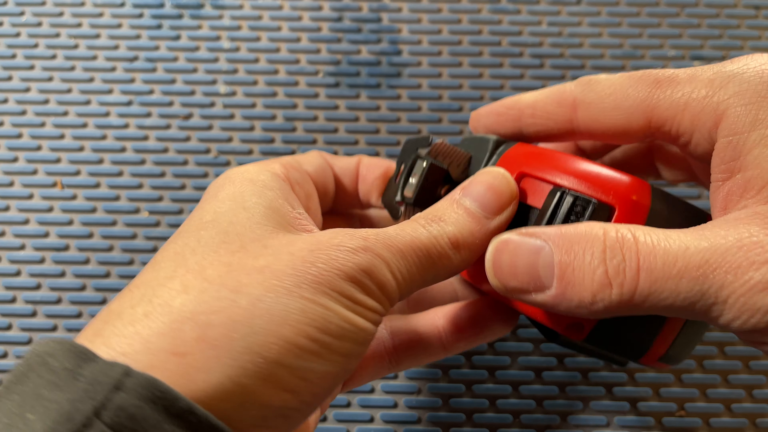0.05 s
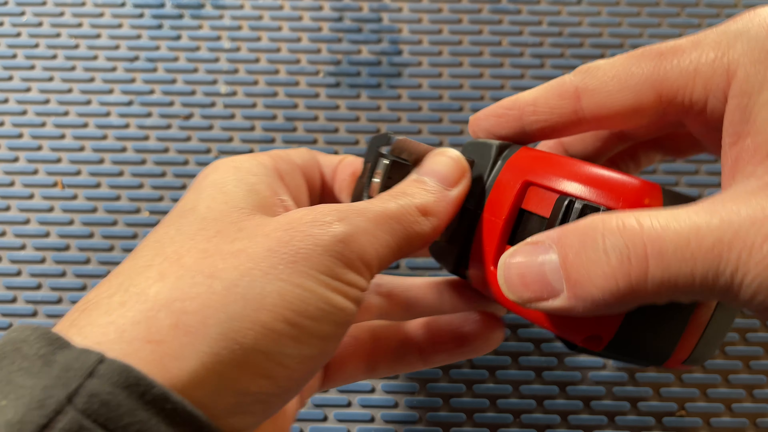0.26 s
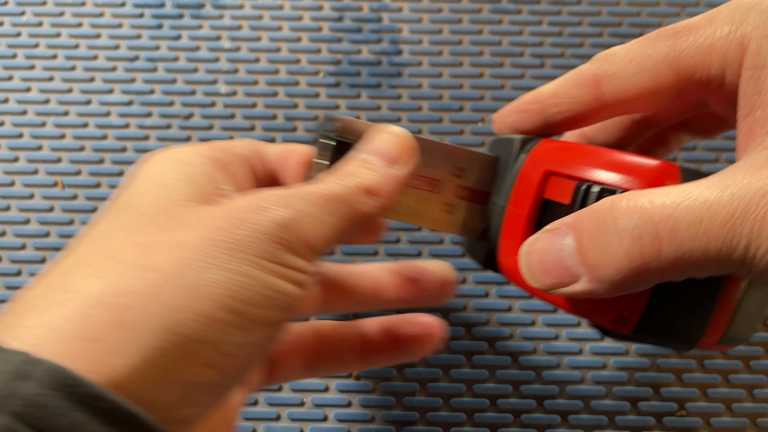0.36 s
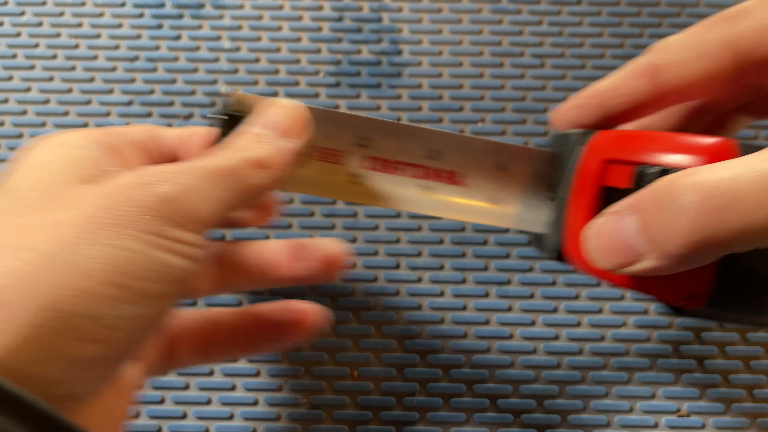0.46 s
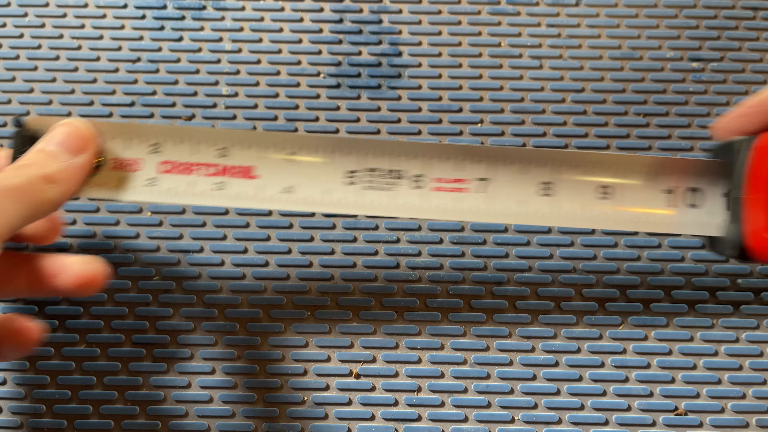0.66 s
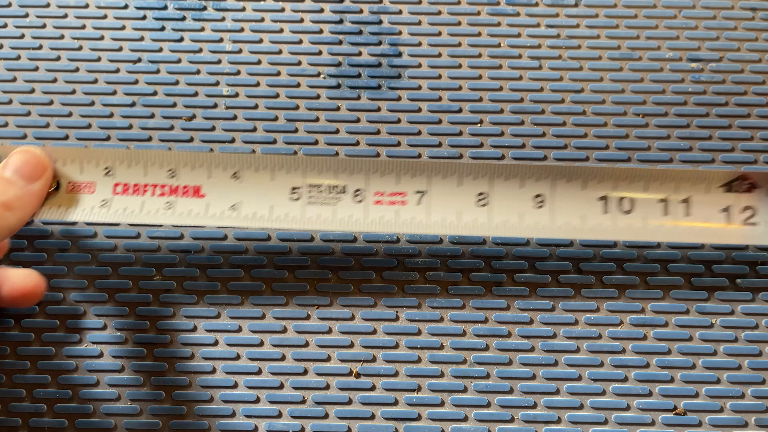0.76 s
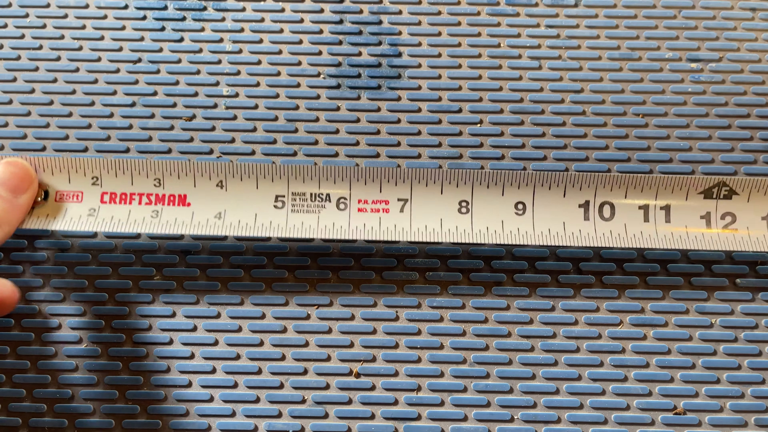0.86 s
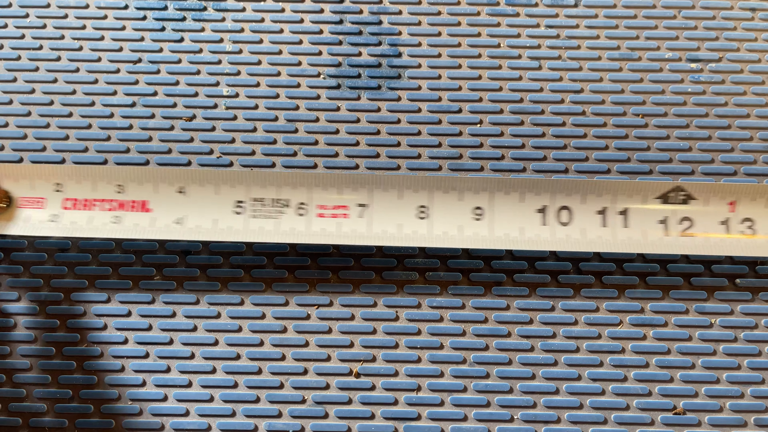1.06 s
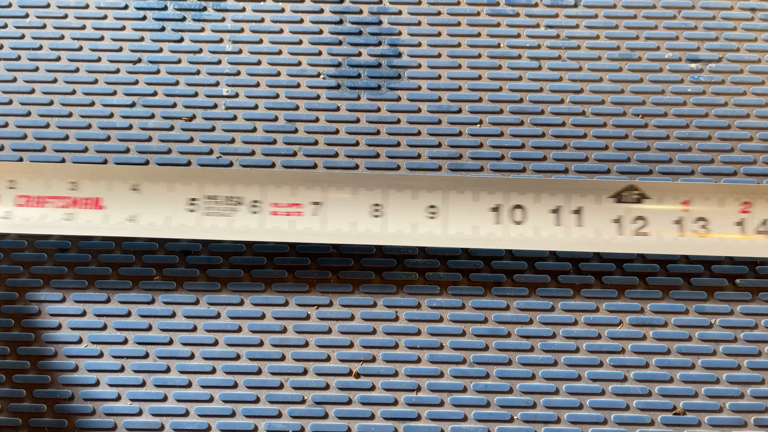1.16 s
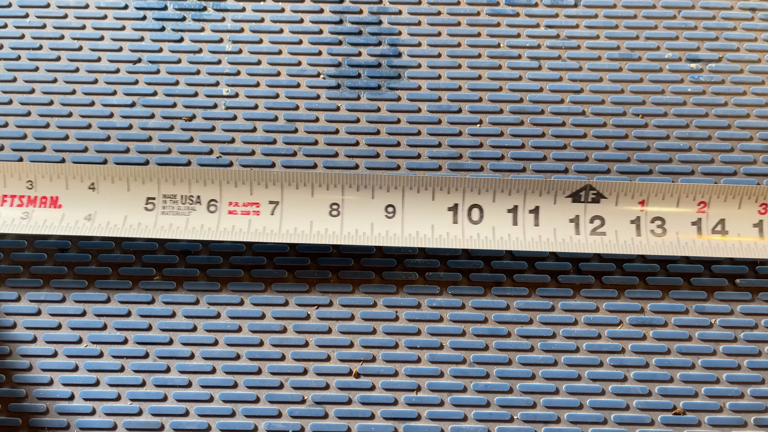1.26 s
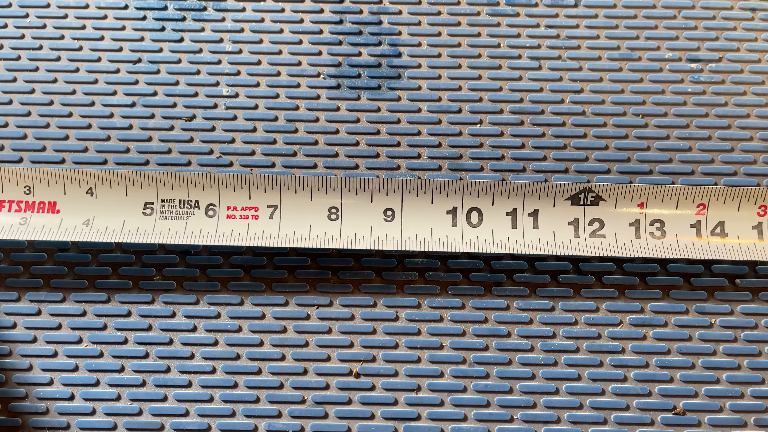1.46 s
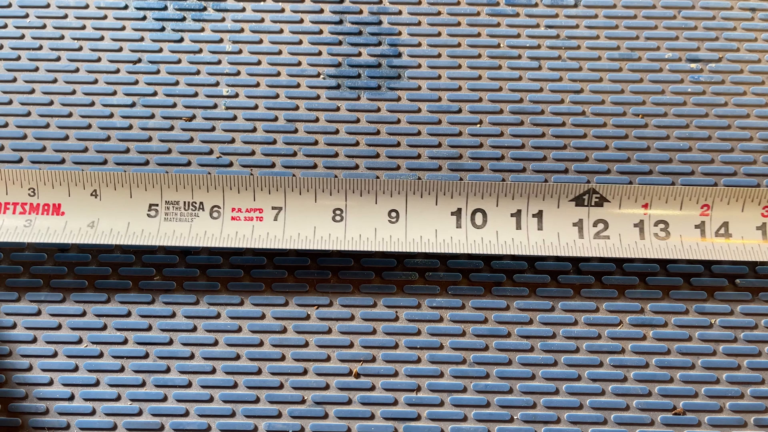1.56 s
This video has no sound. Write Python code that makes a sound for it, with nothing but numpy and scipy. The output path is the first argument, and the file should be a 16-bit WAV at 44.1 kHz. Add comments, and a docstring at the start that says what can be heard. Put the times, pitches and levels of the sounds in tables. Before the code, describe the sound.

Tape measure blade pulled from its case with a snap, a scrape and a soft thump.

```python
"""A small room with a low hum, where a steel tape measure is drawn out of its plastic case, close up.
Fingers tick, scuff and thud on the case, then the hook snaps free and rings the shell.
Friction in the slot makes the blade hiss, fast at first, then slowly, with sharp catches and thin
squeals; its bending modes fall as it lengthens, giving a metallic swish. The case thumps down on a
padded mat and is nudged a few times; the blade stops and the hum remains."""
import sys
import numpy as np
from scipy import signal
from scipy.fft import rfft, irfft
from scipy.io import wavfile

SR = 44100
rng = np.random.default_rng(int(sys.argv[2]) if len(sys.argv) > 2 else 0)


def file_out(sig):
    """Save sig as 16-bit WAV at sys.argv[1]."""
    # one column per channel
    cols = np.atleast_2d(sig).T
    # limit, then scale
    lim = np.clip(cols, -1, 1)
    pcm = np.round(lim * 32767).astype(np.int16)
    wavfile.write(sys.argv[1], SR, pcm)


N = 70560
TIME = np.arange(N) / SR
FREQS = np.maximum(np.fft.rfftfreq(N, 1 / SR), 1)

# colour of the room tone: (frequency [Hz], relative level [dB])
ROOM_TONE_COLOUR = [(25, -9.5), (60, -9.5), (130, 6.5), (200, -4), (300, -5.5), (450, -19.5), (900, -20),
                    (1400, -42.5), (3000, -52.5), (12000, -51)]
# partials of the hum: (frequency [Hz], level [dB])
HUM_PARTIALS = [(64.6, -57), (107.7, -66.5), (150.7, -54)]
# the hook shifts under the fingers: (time [s], half length [s], level [dB], brightness [Hz])
HOOK_RUBS = [(0.012, 0.067, -49, 2190), (0.179, 0.011, -46, 12000), (0.23, 0.066, -54.5, 2200)]
# colour of the hook rubbing on the case: (frequency [Hz], relative level [dB])
HOOK_RUB_COLOUR = [(600, -6), (1150, -10), (1500, -2), (2200, -1), (3000, -1), (4500, -7.5), (7500, -5.5),
                   (9400, 2), (12000, -3)]
# bright ring of hook and case when struck: (frequency [Hz], t60 [s], gain [dB])
CASE_RING_MODES = [(1502, 0.019, -1), (1687, 0.014, 0), (2188, 0.023, -2), (3295, 0.014, -6.5),
                   (3735, 0.0088, -6), (4500, 0.019, -1), (5270, 0.0091, -11.5), (6324, 0.017, -10),
                   (8260, 0.013, -12), (9370, 0.0061, -3), (10770, 0.0098, -2.5)]
# hollow knock of the shell: (frequency [Hz], t60 [s], gain [dB])
SHELL_KNOCK_MODES = [(487, 0.029, -9), (934, 0.019, -7), (1950, 0.017, 0.5)]
# fingers tick on the case: (time [s], gain [dB], brightness [Hz], relative shell knock [dB])
FINGER_TAPS = [(.0075, -37, 1650, -18), (0.027, -44, 1500, 5), (0.0666, -37.5, 2000, 0),
               (0.0945, -33, 4070, -6), (0.0975, -38, 1500, 1)]
# dull thuds: a finger on the case, then the case landing and being nudged:
# (time [s], boom gain [dB], knock gain [dB], knock pitch [Hz])
DULL_THUDS = [(.058, -63.5, -41.5, 397), (0.8725, -29.5, -36.5, 308), (0.884, -31.5, -40.5, 690),
              (0.8903, -54, -27, 339), (1.015, -41, -47, 300), (1.111, -40.5, -40, 366),
              (1.179, -39.5, -36.5, 453), (1.263, -66, -43, 390)]
# the hook slips and snaps free: (time [s], gain [dB], brightness [Hz])
SNAP_CONTACTS = [(0.2218, -26.5, 11840), (0.2231, -29.5, 13930), (.2243, -14.5, 7030), (0.2264, -16, 2154)]
# loudness of the sliding blade: (time [s], level [dB], relative ring of blade and case [dB])
PULL_ENVELOPE = [(.3, -67, 8), (.355, -66.5, 13), (.4, -49, 4), (.48, -37.5, -4), (.585, -35, -5.5),
                 (.64, -36, -16), (.76, -37, -14), (.83, -42, -3.5), (.87, -45, -3), (.905, -55.5, 1),
                 (.96, -49.5, -11), (1.02, -51, -12), (1.045, -45.5, -36), (1.08, -50.5, -6),
                 (1.145, -51.5, -8), (1.168, -45, -11), (1.21, -53, -36), (1.262, -48.5, -16),
                 (1.315, -56.5, -7), (1.35, -78.5, 8.5), (1.42, -100, 12)]
# how far the blade is out: (time [s], length [m])
FREE_LENGTH = [(.34, .067), (.415, .08), (.44, .089), (.57, .125), (.65, .151), (.8, .184), (1.32, .22)]
# colour of the hiss at speed: (frequency [Hz], relative level [dB])
FAST_HISS_COLOUR = [(300, -16.5), (600, -35), (850, -11.5), (1200, -40), (2100, -3.5), (3400, -5),
                    (5200, -3.5), (7300, -5.5), (8000, -1.5), (8600, 4.5), (9400, 1), (10000, 1.5),
                    (11000, 5.5), (11700, -9), (12500, -18)]
# colour of the hiss at a crawl: (frequency [Hz], relative level [dB])
SLOW_HISS_COLOUR = [(300, -2.5), (700, -7.5), (1100, -9.5), (2100, -3.5), (3600, -4.5), (5000, -3.5),
                    (6400, 0.5), (7800, -3.5), (9200, -4.5), (10500, 5), (11300, -6), (12300, -24)]
# resonances of the case around the sliding blade: (frequency [Hz], width [Hz], relative level [dB])
CASE_RASP_MODES = [(1484, 200, -1), (2130, 110, 0.5), (2630, 270, -2.5), (3480, 157.6, -3.5)]
# colour of the blade's bending modes: (frequency [Hz], relative level [dB])
SWISH_COLOUR = [(600, -20), (830, -9), (1400, -6), (2100, -2), (4500, 1), (9000, -6)]
# the blade catches in the slot: (time [s], gain [dB])
SLOT_CATCHES = [(.4767, -27), (.7266, -27), (.768, -24), (.8163, -23), (1.1755, -34), (1.2150, -33)]
# the blade sings: (time [s], half length [s], pitch [Hz], width [Hz], level [dB])
BLADE_SQUEALS = [(0.822, 0.034, 4200, 30, -51), (1.014, 0.06, 2545, 40, -57.5),
                 (1.172, 0.016, 5820, 600, -48.5)]
# stereo image of the close sounds: (frequency [Hz], left lead [rad], left minus right [dB])
STEREO_IMAGE = [(100, 0, 0), (1300, 0, .8), (2000, .3, 1.6), (3000, 1.0, 3), (4500, .6, 3.8),
                (6500, .3, 2.5), (7500, .7, 1.5), (8550, 0, 0), (9400, -1.4, 0), (10280, -3.14, 0),
                (11000, -4.8, 0), (11700, -6.1, 0)]

CASE_LOW_CUT_HZ, TOP_CUT_HZ = 1110, 13100


def from_db(db):
    """Decibels to gain."""
    return 10 ** (np.asarray(db) / 20)


def unit_rms(x):
    """Scale to unit level."""
    return x / np.sqrt(np.mean(x ** 2) + 1e-20)


def over_time(rows):
    """Columns of an envelope at every sample."""
    times, *columns = np.transpose(rows)
    return [np.interp(TIME, times, c) for c in columns]


def over_frequency(rows):
    """Columns of a spectrum at every frequency."""
    hz, *columns = np.transpose(rows)
    return [np.interp(np.log(FREQS), np.log(hz), c) for c in columns]


def coloured(x, colour):
    """EQ a sound and bring it to unit level."""
    return unit_rms(irfft(rfft(x) * from_db(over_frequency(colour)[0]), N))


def soften(x, hz):
    """One-pole low-pass."""
    pole = np.exp(-2 * np.pi * hz / SR)
    return signal.lfilter([1 - pole], [1, -pole], x + 1e-18)


def low_cut(x, hz):
    """Two-pole high-pass."""
    return signal.sosfilt(signal.butter(2, hz, "high", fs=SR, output="sos"), x + 1e-18)


def drift(rate_hz):
    """A smooth random wobble at unit level."""
    return unit_rms(irfft(rfft(rng.standard_normal(N)) / (1 + (FREQS / rate_hz) ** 2), N))


def swell(s, half_s):
    """A bell-shaped fade in and out, peaking at time s."""
    return np.exp(-((TIME - s) / half_s) ** 2)


def ring(s, hz, t60):
    """A mode struck at time s: a dying sine of height 1."""
    click = signal.unit_impulse(N, int(s * SR))
    r, w = from_db(-60 / (t60 * SR)), 2 * np.pi * hz / SR
    return signal.lfilter([0, np.sin(w)], [1, -2 * r * np.cos(w), r * r], click + 1e-18)


def resonate(x, hz, width_hz):
    """Band resonance with gain 1 at its peak."""
    r, w = np.exp(-np.pi * width_hz / SR), 2 * np.pi * hz / SR
    return signal.lfilter(np.array([1, 0, -1]) * (1 - r * r) / 2, [1, -2 * r * np.cos(w), r * r], x)


def room_tone(noise_db=-56.5):
    """A bed of low noise, centred in the bass, and a hum wavering in level and phase."""
    sides = from_db(1.5) * low_cut(rng.standard_normal((2, N)), 250)
    noise = coloured(rng.standard_normal(N) + sides, ROOM_TONE_COLOUR)
    hum = sum(from_db(db + 2 * drift(12)) * np.sin(2 * np.pi * hz * TIME + 1.7 * drift(7.2))
              for hz, db in HUM_PARTIALS)
    return from_db(noise_db) * noise + hum


def friction(grains_per_s=5200, grain_share=.24, sides_top_hz=6800):
    """Sliding surfaces: fine hiss grained with tiny catches, plus duller noise for stereo width."""
    sizes = from_db(1.5 * np.minimum(rng.exponential(1, N), 3)) * rng.choice([-1, 1], N)
    grains = unit_rms(sizes * (rng.random(N) < grains_per_s / SR))
    centre = np.sqrt(grain_share) * grains + np.sqrt(1 - grain_share) * rng.standard_normal(N)
    sides = soften(soften(rng.standard_normal((2, N)), sides_top_hz), sides_top_hz)
    return centre + sides


def hook_rubs():
    """Short scuffs of the hook against the case."""
    rub = coloured(friction(), HOOK_RUB_COLOUR)
    fade_in = np.interp(TIME, [0, .005], [0, 1])
    return fade_in * sum(from_db(db) * swell(s, half_s) * unit_rms(soften(rub, hz))
                         for s, half_s, db, hz in HOOK_RUBS)


def crack(s, decay_s):
    """The attack of a hard contact: a very short, bright noise burst."""
    age = np.maximum(TIME - s, 0)
    burst = rng.standard_normal(N) * (age > 0) * np.exp(-age / decay_s)
    return low_cut(burst, CASE_LOW_CUT_HZ)


def case_click(s, bright_hz):
    """One contact cracks and rings hook and case; so small a body radiates little bass."""
    modes = sum((-1) ** k * from_db(db) * ring(s, hz, t60)
                for k, (hz, t60, db) in enumerate(CASE_RING_MODES))
    attack = from_db(-5) * crack(s, decay_s=.0015)
    return soften(low_cut(modes, CASE_LOW_CUT_HZ) + attack, bright_hz)


def finger_taps():
    """Fingers set off small clicks, each with a hollow knock of the shell."""
    taps = np.zeros(N)
    for s, db, bright_hz, shell_db in FINGER_TAPS:
        shell = sum(from_db(mode_db) * ring(s, hz, t60) for hz, t60, mode_db in SHELL_KNOCK_MODES)
        taps += from_db(db) * (case_click(s, bright_hz) + from_db(shell_db) * shell)
    return taps


def dull_thuds(landing_s=.89, scuff_s=.0116, scuff_db=-39, scuff_hz=870):
    """Low booms with dull knocks: a finger on the case, then its scuffing landing and nudges."""
    hits = sum(from_db(boom_db) * ring(s, hz=67, t60=.26) + from_db(knock_db) * ring(s, hz, t60=.035)
               for s, boom_db, knock_db, hz in DULL_THUDS)
    thumps = soften(low_cut(hits, 54), 500)
    scuff = unit_rms(soften(soften(friction(), scuff_hz), scuff_hz))
    return thumps + from_db(scuff_db) * np.exp(-abs(TIME - landing_s) / scuff_s) * scuff


def hook_snap():
    """The hook breaks free: a quick run of contacts heard as one loud click."""
    return sum(from_db(db) * case_click(s, hz) for s, db, hz in SNAP_CONTACTS)


def bowed_tone(hz, width_hz):
    """A resonance kept ringing by friction; its pitch and width may glide."""
    phase = 2 * np.pi * np.cumsum(hz * np.ones(N)) / SR
    width = width_hz * np.ones(N)
    clock = np.cumsum(width / width.mean())  # a wider band wobbles faster
    sine_gain, cosine_gain = (np.interp(clock, np.arange(N), drift(width.mean())) for _ in range(2))
    return unit_rms(sine_gain * np.sin(phase) + cosine_gain * np.cos(phase))


def blade_swish(stiffness_m2_hz=1.024, width_share=.03):
    """Damped bending modes of the free blade, driven by its speed, fall as 1 / length squared."""
    length, = over_time(FREE_LENGTH)
    speed = soften(np.gradient(length), 9.7)
    drive = np.sqrt(np.clip(speed / speed.max(), 0, 1))
    pitches = [stiffness_m2_hz * ((k + .5) / length) ** 2 for k in range(2, 20)]
    tones = sum(bowed_tone(hz, width_share * hz) * (hz < TOP_CUT_HZ) for hz in pitches)
    return drive * coloured(tones / np.sqrt(length), SWISH_COLOUR)


def grit(specks_per_s=110, decay_s=.0012, depth=1.6):
    """Gain on the hiss: specks in the slot make it flare in brief, uneven bursts."""
    specks = (rng.random(N) < specks_per_s / SR) * rng.random(N)
    flares = signal.lfilter([1], [1, -np.exp(-1 / (decay_s * SR))], specks)
    return unit_rms(1 + depth * flares)


def blade_slide(crossfade_db=-45.5, crossfade_width_db=7, flutter_db=.9):
    """Friction at the slot hisses, rasps in the case and rings the blade."""
    level_db, ringing_db = over_time(PULL_ENVELOPE)
    rub, drag = friction(), friction()
    # the louder the pull, the more the hiss takes on its fast colour
    fast = .5 + .5 * np.tanh((level_db - crossfade_db) / crossfade_width_db)
    hiss = fast * coloured(rub, FAST_HISS_COLOUR) + (1 - fast) * coloured(rub, SLOW_HISS_COLOUR)
    rasp = unit_rms(sum((-1) ** k * from_db(db) * resonate(drag, hz, width)
                        for k, (hz, width, db) in enumerate(CASE_RASP_MODES)))
    ringing = from_db(-2) * rasp + from_db(-1.5) * blade_swish()
    scrape = from_db(1.24) * hiss * grit() + from_db(ringing_db) * ringing
    gate = np.interp(TIME, [.22, .24], [0, 1])  # opens as the hook snaps free
    return gate * from_db(level_db + flutter_db * drift(rate_hz=40)) * scrape


def blade_catches(band_hz=(3400, 9000)):
    """The moving blade snags in the slot with thin, sharp ticks."""
    ticks = sum(from_db(db) * crack(s, decay_s=.0018) for s, db in SLOT_CATCHES)
    return signal.sosfilt(signal.butter(2, band_hz, "band", fs=SR, output="sos"), ticks)


def blade_squeals():
    """The slowing blade sings thinly or rasps brightly for a moment."""
    return sum(from_db(db) * swell(s, half_s) * bowed_tone(hz, width)
               for s, half_s, hz, width, db in BLADE_SQUEALS)


def place_close(x):
    """Near sound reaches left and right with its own phase and level at each frequency."""
    lead, balance_db = over_frequency(STEREO_IMAGE)
    left, right = rfft(x)
    tilt = from_db(balance_db / 2)
    return irfft(np.array([left * tilt, right / tilt * np.exp(-1j * lead)]), N)


def room_reverb(x, t60=.1, wet_db=-18, damping_hz=3810):
    """The small room returns a short, dull tail, different on each side."""
    tail = soften(rng.standard_normal((2, N)), damping_hz) * from_db(-60 * TIME / t60)
    return from_db(wet_db) * signal.fftconvolve(x, unit_rms(tail) / np.sqrt(N), axes=1)[:, :N]


def scene():
    """The tape measure up close with a touch of reverb, over dry thuds and room tone."""
    tape = blade_slide() + blade_squeals() + finger_taps() + hook_snap() + blade_catches() + hook_rubs()
    return place_close(tape) + dull_thuds() + room_reverb(tape) + room_tone()


def record(dry):
    """A steep high cut on the whole mix."""
    return signal.sosfilt(signal.cheby2(16, 60, TOP_CUT_HZ, fs=SR, output="sos"), dry)


dry = scene()
out = record(dry)
file_out(out)
```